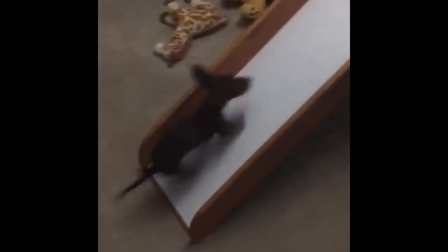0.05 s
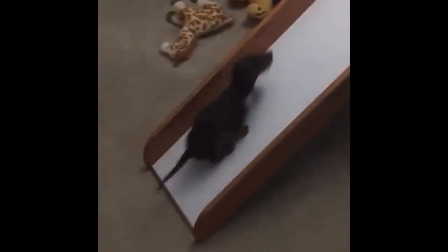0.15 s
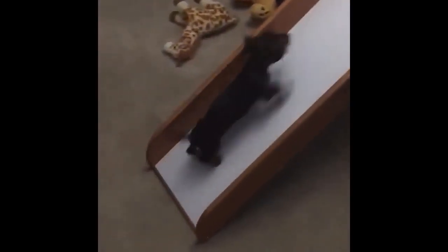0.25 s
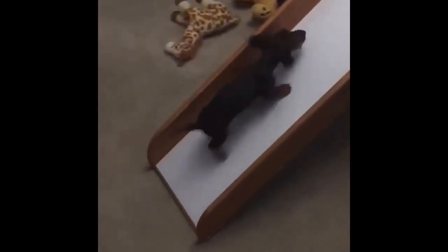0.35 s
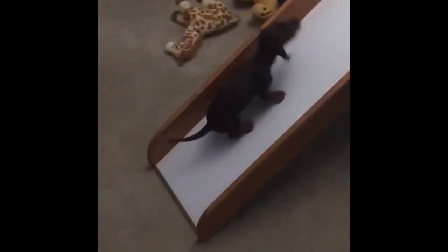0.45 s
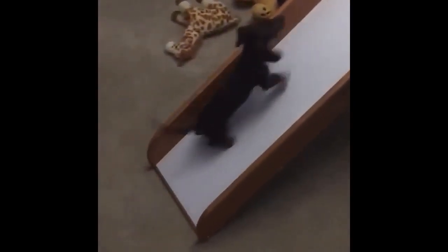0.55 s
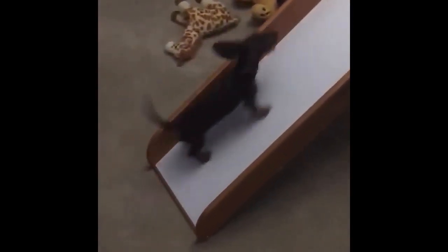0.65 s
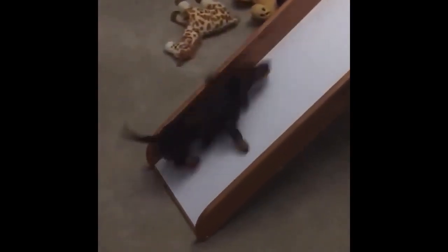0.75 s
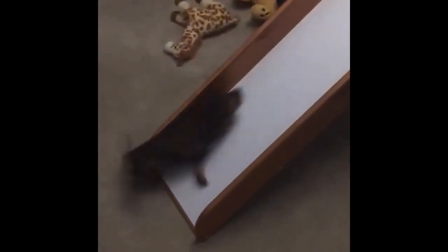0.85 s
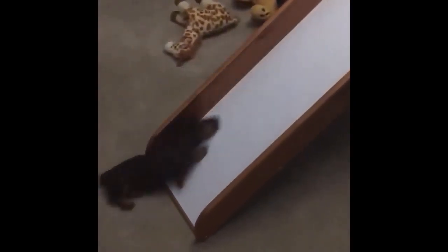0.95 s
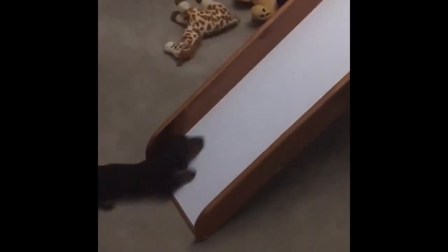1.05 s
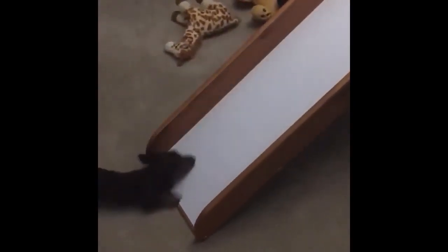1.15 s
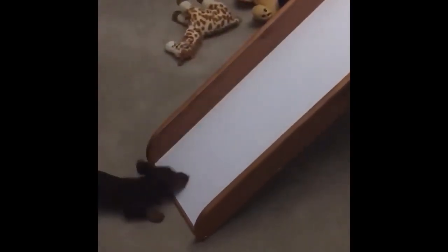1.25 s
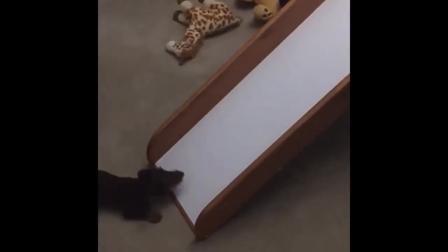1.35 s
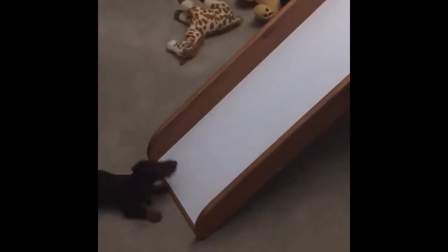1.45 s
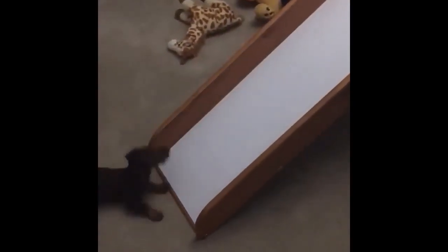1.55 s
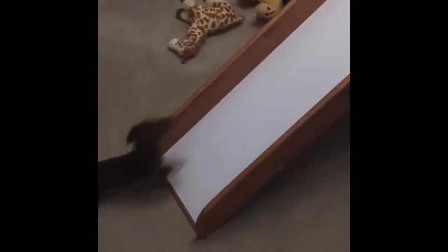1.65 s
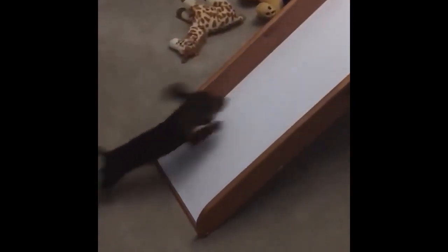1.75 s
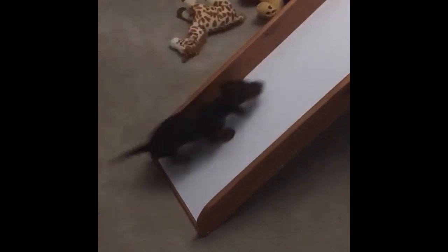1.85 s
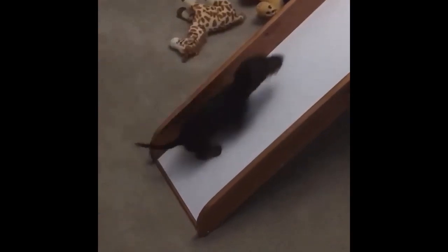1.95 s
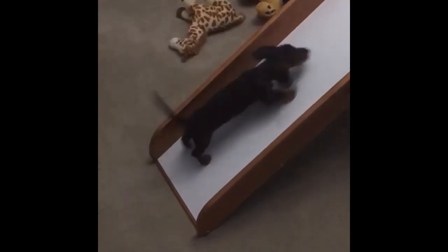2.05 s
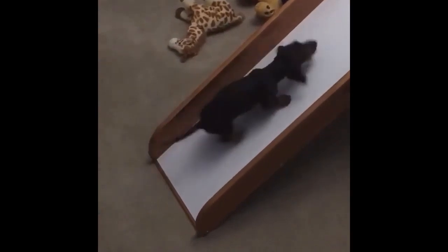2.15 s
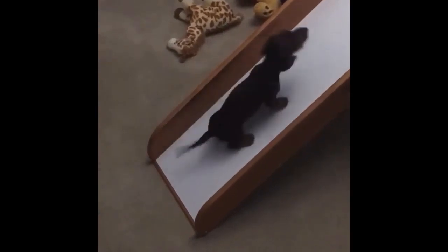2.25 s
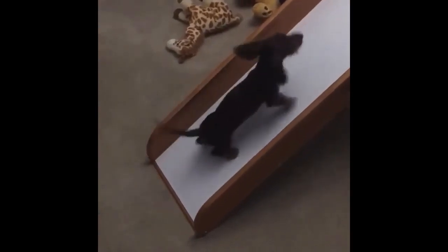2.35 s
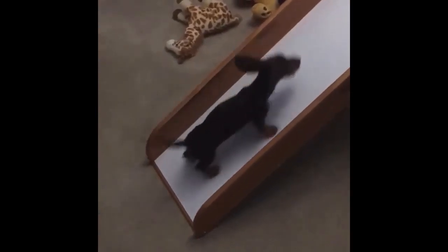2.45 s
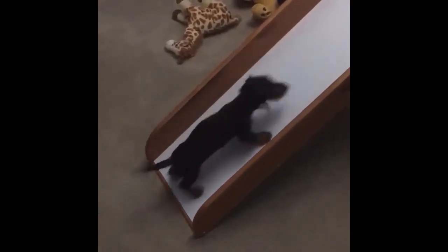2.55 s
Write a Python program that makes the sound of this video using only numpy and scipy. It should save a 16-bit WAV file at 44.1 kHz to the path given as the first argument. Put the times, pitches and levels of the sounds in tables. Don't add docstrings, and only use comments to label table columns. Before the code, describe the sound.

Hollow wooden thuds and light knocks from a small dog climbing a slide, with dry claw scuffs and soft floor booms; it slips, pauses, then scrambles again. Close indoor mono sound, faint lens ticking and room rumble.

```python
import sys
import numpy as np
from scipy import signal
from scipy.io import wavfile
from scipy.ndimage import uniform_filter1d

SR = 44100
rng = np.random.default_rng(int(sys.argv[2]) if len(sys.argv) > 2 else 0)


def volts_from_db(level):
    exponent = np.asarray(level, float) / 20
    return 10 ** exponent


def unload_wav(signal):
    wavfile.write(
        sys.argv[1],
        SR,
        np.round(np.clip(np.atleast_2d(signal).T, -1, 1) * 32767).astype(np.int16),
    )


N = 114660
T = np.arange(N) / SR
HALF_S = T[:SR // 2]

# start in seconds, board level in dB, favoured board pitch in Hz,
# knock re board in dB, favoured knock pitch in Hz.
PAW_THUMPS = [(0.041, -44.5, 169, -14, 610), (.205, -41, 246, 3, 646), (.226, -28, 192, -15.5, 575),
              (.304, -28, 180, -11, 495), (.321, -21.5, 172, -6.5, 705), (.343, -32, 220, -9, 500),
              (.421, -29.5, 136, -5, 1100), (.476, -34.5, 140, -4, 475), (0.61, -29.5, 181, 0, 613),
              (.781, -52, 200, -12, 650), (0.915, -36.5, 200, -13, 605), (.945, -18, 196, -4.5, 610),
              (0.9727, -17, 215, -18, 646), (0.996, -34, 283, -3, 620), (1.116, -34.5, 268, 6, 900),
              (1.135, -42, 318, 4.5, 453), (1.344, -41, 180, -16, 1100), (1.595, -49.5, 330, 3, 605),
              (1.616, -46, 288, 0, 463), (1.963, -31, 205, -11.5, 685), (2.084, -18.5, 184, -11, 750),
              (2.195, -32.5, 207, 1.5, 1400), (2.232, -35.5, 202, 1, 483), (2.376, -39.5, 182, -16, 500)]
# start in seconds, level in dB, lower mode re upper in dB.
FLOOR_BOOMS = [(.036, -45, -16), (0.161, -51, -1), (.224, -46, -15), (0.327, -31.5, -8), (.348, -26.5, -9),
               (0.431, -50, -6), (.48, -48, -4), (.52, -47, -7), (0.629, -30, 1), (.708, -41, 9),
               (0.786, -43.5, 13), (.855, -50.5, 0), (0.959, -29.5, 0), (1.0, -24, -7), (1.061, -32.5, -7),
               (1.123, -35.5, 1), (1.157, -35, -21), (1.321, -47, 2), (1.371, -44, -13),
               (1.398, -43.5, -16), (1.47, -53, 1), (1.825, -45.5, -21), (1.987, -40.5, -3),
               (2.06, -37, -2), (2.12, -28.5, -19), (2.246, -39, 3), (2.287, -40, -3), (2.348, -49, -2),
               (2.415, -49, -5), (2.549, -47, -4)]
# start in seconds, level in dB, favoured knock pitch in Hz.
LIGHT_RAPS = [(.001, -37, 1600), (.004, -40, 905), (.010, -44, 1380), (.022, -44, 1600), (.040, -49, 1620),
              (.240, -39.5, 1130), (.325, -32, 1250), (.338, -39, 794), (.508, -42, 620),
              (.562, -41.5, 1160), (.628, -49, 520), (.645, -50, 540), (.785, -36.5, 1400),
              (.805, -44, 644), (.936, -41, 1650), (.953, -33, 610), (.963, -44, 1210), (.9755, -23, 570),
              (.986, -25, 1120), (.997, -29.5, 620), (1.010, -46, 640), (1.029, -30, 1370),
              (1.044, -51, 1400), (1.131, -40, 1150), (1.380, -42.5, 1280), (1.803, -47.5, 1250),
              (1.964, -31.5, 690), (1.985, -44, 690), (1.986, -41, 1720), (2.048, -53, 1540),
              (2.089, -28.5, 560), (2.093, -29.5, 1330), (2.104, -35, 820), (2.150, -37, 586),
              (2.163, -39, 1500), (2.196, -33.5, 575), (2.208, -43, 1360), (2.233, -36.5, 1260),
              (2.255, -43, 1150), (2.360, -49.5, 615), (2.458, -59, 1630)]
# start in seconds, level in dB, favoured board pitch in Hz.
WEIGHT_THUDS = [(.482, -38.5, 277), (0.529, -46, 282), (.645, -44, 140), (1.004, -30.5, 140),
                (1.044, -46, 190), (1.133, -40.5, 139), (1.482, -54.5, 151), (1.978, -32, 180),
                (2.106, -36, 292), (2.205, -33.5, 140), (2.215, -33.5, 290), (2.262, -42.5, 333),
                (2.511, -47.5, 146)]
# frequency in Hz, level in dB, t60 in seconds.
BOARD_MODES = [(137, -2.5, 0.25), (181.3, -3, 0.17), (219.2, -6, 0.2), (280, -1.5, 0.15), (336.8, -8, 0.18),
               (392.8, -3.5, 0.27)]
# frequency in Hz, level in dB, t60 in seconds.
KNOCK_MODES = [(440, -2, .06), (525, -1, .05), (650, 0, .045), (760, -3, .04), (900, -4, .04),
               (1040, -4, .035), (1175, -1, .045), (1370, -1, .04), (1600, -3, .03), (1850, -7, .03)]
# start in seconds, level in dB, t60 in seconds, pad rasp re claw in dB,
# top re claw in dB.
CLAW_SCUFFS = [(0.2034, -29.5, 0.14, -8, -2), (0.2309, -30, 0.16, -10, 1), (0.2962, -34, 0.11, -2, -16),
               (0.323, -32.5, 0.075, 2.5, 2), (0.3633, -29, 0.1, -11, -19),
               (0.42, -23.5, 0.11, -10.5, -4.5), (0.4744, -25.5, 0.24, -15, -5.5),
               (0.611, -34, 0.05, 6, -1), (0.7812, -31.5, 0.76, -4.5, -3), (0.9253, -29.5, 0.33, -11, -10),
               (0.9913, -31.5, 0.35, -23, 0.5), (1.0273, -27, 0.043, -14, 3),
               (1.1157, -33, 0.089, 3.5, -14), (1.377, -33, 0.054, -4, -18), (1.589, -54, 0.22, 10, -3),
               (1.799, -43, 0.049, -5, -6), (1.968, -26, 0.045, -9, -16), (1.9813, -37.5, 0.29, -6, -3.5),
               (2.0975, -32, 0.25, -9, -3.5), (2.159, -34.5, 0.22, 0.5, -8),
               (2.1936, -24.5, 0.14, -8, -2.5), (2.2307, -30, 0.15, -18, -7), (2.4995, -30.5, 0.1, -17, 0),
               (2.5548, -29, 0.1, -26, -2), (0.861, -30, 0.12, -24, -19), (1.172, -36, 0.2, -5.5, -3),
               (2.0448, -46, 0.17, 11, -5), (2.2727, -35, 0.058, -8, -11), (2.369, -43, 0.16, -7, -8),
               (2.4508, -42, 0.046, 1, -7), (2.588, -31, .08, -18, -12)]
# time in seconds, level in dB, top re claw in dB, pad rasp re claw in dB.
PAW_SKID = [(0, -45.5, -24, -1), (0.118, -81.5, 4, -12), (.2, -78, 0, -1), (.34, -49, -4, -5.5),
            (.5, -45, -3.5, -4.5), (.6, -55, -8, -4), (.7, -50, -3, -1.5), (.775, -51, -6.5, -0.5),
            (0.861, -40, -7, -30), (.95, -40.5, -14.5, -2), (1.14, -55, -4.5, -4),
            (1.24, -50.5, -4.5, -5.5), (1.356, -49, -5, -6), (1.47, -84, 1, 7.5), (1.96, -75, -5, 3),
            (2.28, -54, -8, -6), (2.357, -67.5, -4, 0), (2.482, -49.5, -1, -3.5)]
# centre in Hz, width in Hz, level in dB.
CLAW_PEAKS = [(3460, 980, -6.5), (4164, 390, -1.5), (5470, 1750, -3.5)]
# centre in Hz, width in Hz, level in dB.
TOP_PEAKS = [(6970, 2740, -0.5), (8700, 790, -7.5), (10900, 10500, -9)]
# centre in Hz, width in Hz, level in dB.
PAD_PEAKS = [(717, 430, -5), (1310, 526, 4), (1730, 150, -9.5), (2200, 980, -6)]
# frequency in Hz, density in dB per Hz.
ROOM_AIR = [(15, -31), (25, 11.5), (70, 5), (476, -13), (1330, -24), (2690, -41), (7110, -45), (14800, -53),
            (16000, -47)]
# centre in Hz, width in Hz, level in dB.
MIC_HISS = [(1250, 360, -84.5), (4080, 1800, -84), (6060, 2100, -94), (8900, 370, -82),
            (12300, 4600, -85.5)]

MODE_SCATTER_DB, DETUNE = 4, 0.036
PAD_PUSH_S, KNOCK_PUSH_S, RAP_PUSH_S, BOOM_RISE_S = .0042, 0.00019, 0.00033, 0.0078
BOARD_FALL_DB_OCT, KNOCK_FALL_DB_OCT, RAP_FALL_DB_OCT, THUD_FALL_DB_OCT = 17, 14, 23.5, 26.5
BOARD_SCATTER, KNOCK_SCATTER = 0.69, 0.46
GRIT_PER_S, GRIT_SPREAD_DB, FLICKER_DB = 8000, 3, 2
SCUFF_DB, SCUFF_RISE_S, SKID_RUMBLE_DB = -9.5, 0.0015, -16
FIRM_DB = -27.5
CATCH_DB, CATCH_S = 4, .005
CLUMP_DB, CLUMPS_PER_S = 1.1, 120
ROOM_T60_S, ROOM_DB, ROOM_TOP_HZ, ROOM_STEP_S = 0.3, -9.5, 6500, .1
TICK_S, TICK_EVERY_S, TICK_HZ, TICK_WIDTH_HZ = .0388, .05, 6300, 2300
TICK_DB, TICK_TRIM_DB, TICK_TOP_DB = -53, 5.5, -11.5
AIR_DB = -60.5


def unit(x):
    return x / np.sqrt(np.mean(x ** 2))


def band(x, hz, width_hz):
    return signal.lfilter(*signal.iirpeak(hz, hz / width_hz, SR), x)


def band2(x, hz, width_hz):
    return band(band(x, hz, width_hz), hz, width_hz)


def walk(rate_hz):
    k = int(SR / rate_hz)
    held = np.repeat(rng.standard_normal(N // k + 1), k)
    return unit(uniform_filter1d(uniform_filter1d(held, k), k)[:N])


def fade(t60_s):
    return np.exp(-np.log(1000) * HALF_S / t60_s)


def add(out, x, start_s):
    i = int(start_s * SR)
    out[i:i + len(x)] += x[:N - i]


def ring(modes, favoured_hz, fall_db_oct, scatter, rise_s):
    y = 0
    for k, ((hz, db, t60_s), (level, pitch)) in enumerate(zip(modes, scatter)):
        octaves = abs(np.log2(hz / favoured_hz))
        gain = (-1) ** k * volts_from_db(db + MODE_SCATTER_DB * level - fall_db_oct * octaves)
        y = y + gain * np.sin(2 * np.pi * hz * (1 + DETUNE * pitch) * HALF_S) * fade(t60_s)
    y = y * (1 - np.exp(-(HALF_S / rise_s) ** 2))
    return y / np.abs(y).max()


def thumps():
    out = np.zeros(N)
    low_count = len(BOARD_MODES)
    chance = rng.standard_normal((len(PAW_THUMPS), low_count + len(KNOCK_MODES), 2))
    for (s, db, board_hz, knock_db, knock_hz), c in zip(PAW_THUMPS, chance):
        board = ring(BOARD_MODES, board_hz, BOARD_FALL_DB_OCT, BOARD_SCATTER * c[:low_count], PAD_PUSH_S)
        knock = ring(KNOCK_MODES, knock_hz, KNOCK_FALL_DB_OCT, KNOCK_SCATTER * c[low_count:], KNOCK_PUSH_S)
        add(out, volts_from_db(db) * (board + volts_from_db(knock_db) * knock), s)
    for s, db, low_db in FLOOR_BOOMS:
        floor_modes = [(62.9, 0, 0.13), (48.3, low_db, 0.17)]
        add(out, volts_from_db(db) * ring(floor_modes, 1., 0, np.zeros((2, 2)), BOOM_RISE_S), s)
    return out


def raps():
    out = np.zeros(N)
    even_knock, even_board = np.zeros((len(KNOCK_MODES), 2)), np.zeros((len(BOARD_MODES), 2))
    for k, (s, db, hz) in enumerate(LIGHT_RAPS):
        knock = ring(KNOCK_MODES, hz, RAP_FALL_DB_OCT, even_knock, RAP_PUSH_S)
        add(out, (-1) ** k * volts_from_db(db) * knock, s)
    for s, db, hz in WEIGHT_THUDS:
        add(out, volts_from_db(db) * ring(BOARD_MODES, hz, THUD_FALL_DB_OCT, even_board, PAD_PUSH_S), s)
    return out


def grit(peaks):
    out = 0
    for hz, width_hz, db in peaks:
        hits = (rng.random(N) < GRIT_PER_S / SR) * rng.standard_normal(N)
        slips = hits * volts_from_db(GRIT_SPREAD_DB * np.minimum(rng.exponential(size=N), 4))
        out = out + volts_from_db(db + FLICKER_DB * walk(60)) * unit(band2(slips, hz, 2 * width_hz))
    return unit(out)


def scuff_power(db, t60_s):
    rise_s = SCUFF_RISE_S * volts_from_db(0.54 * max(FIRM_DB - db, 0))
    drag = volts_from_db(db + SCUFF_DB) * (1 - np.exp(-HALF_S / rise_s)) * fade(max(t60_s, .01))
    bite = volts_from_db(CATCH_DB + 1.9 * min(db - FIRM_DB, 0)) * np.exp(-(HALF_S / CATCH_S) ** 2 / 2)
    return drag ** 2 * (volts_from_db(-CATCH_DB) + bite)


def claws():
    at_s, skid_db, top_db, pad_db = np.array(PAW_SKID).T
    skid = volts_from_db(np.interp(T, at_s, skid_db) + 2.0 * walk(34.02))
    claw = skid ** 2
    pad = (volts_from_db(np.interp(T, at_s, pad_db)) * skid) ** 2
    top = (volts_from_db(np.interp(T, at_s, top_db)) * skid) ** 2
    for s, db, t60_s, scuff_pad_db, scuff_top_db in CLAW_SCUFFS:
        power = scuff_power(db, t60_s)
        add(claw, power, s)
        add(pad, power * volts_from_db(scuff_pad_db) ** 2, s)
        add(top, power * volts_from_db(scuff_top_db) ** 2, s)
    rumble = unit(sum(volts_from_db(db) * band(rng.standard_normal(N), hz, 38) for hz, db, _ in BOARD_MODES))
    clumps = volts_from_db(CLUMP_DB * walk(CLUMPS_PER_S))
    scrape = np.sqrt(claw) * grit(CLAW_PEAKS) + np.sqrt(top) * grit(TOP_PEAKS) + np.sqrt(pad) * grit(PAD_PEAKS)
    return clumps * scrape + volts_from_db(SKID_RUMBLE_DB) * skid * rumble


def room(x):
    out = 0
    lowpass = signal.butter(1, ROOM_TOP_HZ, fs=SR)
    for at_s in np.arange(0, N / SR + ROOM_STEP_S, ROOM_STEP_S):
        noise = signal.lfilter(*lowpass, rng.standard_normal(len(HALF_S)))
        tail = noise * fade(ROOM_T60_S) * (HALF_S > .004)
        tail = tail / np.sqrt(np.sum(tail ** 2))
        crossfade = np.maximum(1 - abs(T - at_s) / ROOM_STEP_S, 0)
        out = out + signal.fftconvolve(x * crossfade, tail)[:N]
    return out


def lens_ticks():
    x = np.zeros(N)
    steady_s = np.arange(TICK_S, N / SR, TICK_EVERY_S)
    stray_s = np.array([.099, 1.455, 1.535, 1.754, 1.845, 1.946])
    x[(steady_s * SR).astype(int)] = volts_from_db(rng.standard_normal(len(steady_s)))
    x[(stray_s * SR).astype(int)] = 1
    y = band2(x, TICK_HZ, TICK_WIDTH_HZ) + volts_from_db(TICK_TOP_DB) * band(x, 12000, 2000)
    return volts_from_db(TICK_DB + TICK_TRIM_DB) * y / y.max()


def air():
    rumble, hiss = 0, 0
    air_hz, air_db = np.array(ROOM_AIR).T
    for hz in 30 * 2 ** np.arange(0, 9.1, .5):
        level_db = np.interp(np.log(hz), np.log(air_hz), air_db) + 1.3 * walk(8.26)
        rumble = rumble + volts_from_db(level_db) * band2(rng.standard_normal(N), hz, hz / 2)
    for hz, width_hz, db in MIC_HISS:
        hiss = hiss + volts_from_db(db + 0.81 * walk(9.4)) * unit(band(rng.standard_normal(N), hz, width_hz))
    return volts_from_db(AIR_DB) * unit(rumble) + hiss


def scene():
    slide = thumps() + raps() + claws()
    mix = slide + volts_from_db(ROOM_DB) * room(slide) + lens_ticks() + air()
    return np.tile(mix, (2, 1))


def band_limit(x):
    return signal.sosfilt(signal.butter(12, 16350, fs=SR, output="sos"), x)


def record(dry):
    bass_cut = signal.lfilter(*signal.butter(2, 26, "high", fs=SR), dry)
    top_cut = signal.ellip(8, .2, 70, 15750, fs=SR, output="sos")
    return band_limit(signal.sosfilt(top_cut, bass_cut))


dry = scene()
out = record(dry)
unload_wav(out)
```